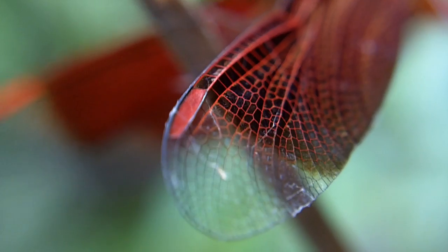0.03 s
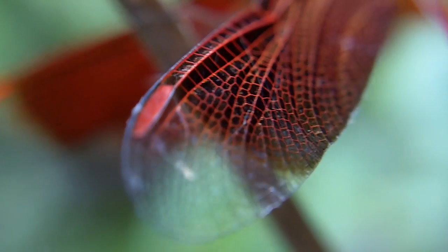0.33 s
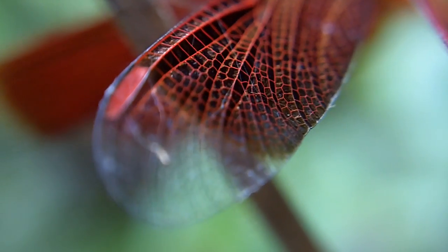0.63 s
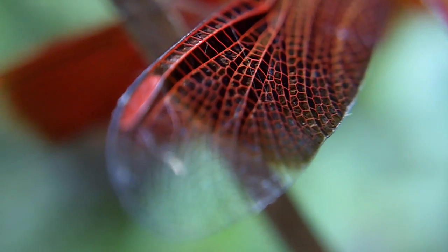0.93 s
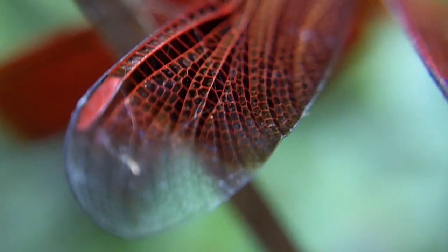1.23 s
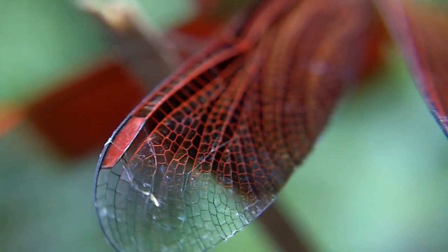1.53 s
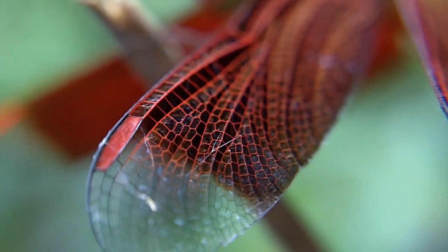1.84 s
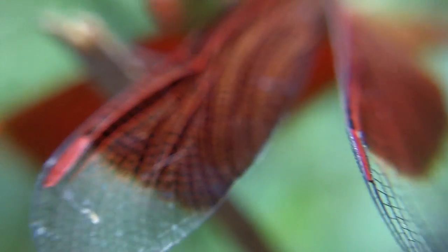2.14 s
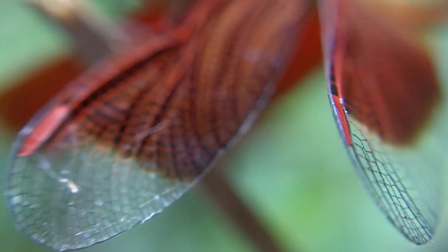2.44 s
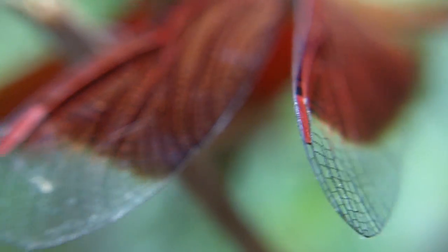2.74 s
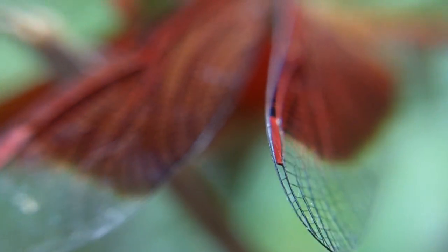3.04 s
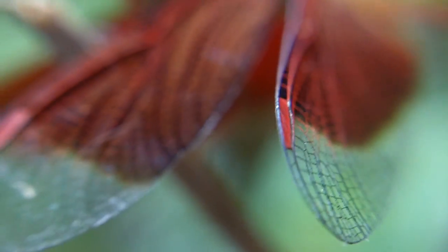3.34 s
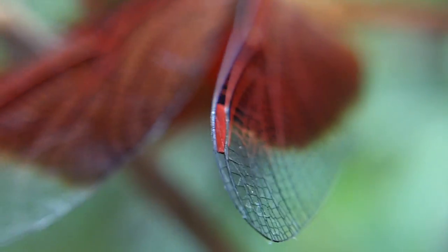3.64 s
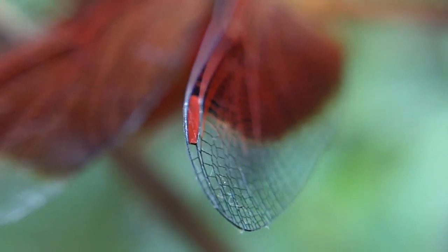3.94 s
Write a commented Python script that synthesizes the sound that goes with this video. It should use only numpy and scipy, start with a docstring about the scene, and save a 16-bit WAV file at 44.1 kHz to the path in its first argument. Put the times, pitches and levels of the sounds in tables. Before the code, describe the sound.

Soft outdoor air hisses while far insects shrill and rasp over a low rumble.

```python
"""A soft hiss of distant air fills quiet greenery. Far insects blend into one shrill band near 7 kHz,
and a single insect rasps in five slow swells. A distant motor hums over a low rumble, and a faint
whistle comes near the end. The sound starts after a moment of silence, all from one microphone,
with a dip in the treble."""
import sys
import numpy as np
from scipy import signal
from scipy.fft import rfft, irfft, next_fast_len
from scipy.io import wavfile
from scipy.ndimage import map_coordinates

SR = 44100
rng = np.random.default_rng(int(sys.argv[2]) if len(sys.argv) > 2 else 0)


def wav_record(signal):
    """Record a signal, one row per channel, as 16-bit PCM in the file named by sys.argv[1]."""
    frames = np.transpose(np.atleast_2d(signal))
    bounded = np.clip(frames, -1, 1)
    # unit amplitude maps onto the largest positive 16-bit level
    quanta = np.round(bounded * 32767).astype(np.int16)
    wavfile.write(sys.argv[1], SR, quanta)


N = 176400  # 4 s

# Tone of the steady hiss: f/Hz, relative level/dB
HISS_TONE = [(150, -1), (250, -1), (330, -5), (500, -5), (700, -8.5), (1000, -8.5), (1500, -8.5),
             (2000, -9.5), (3000, -11), (4300, -12), (6200, -5.5), (7000, -6), (8000, -12.5), (10000, -23),
             (12000, -31), (13500, -35.5), (15000, -44)]
# Tone of the duller, distant wash: f/Hz, relative level/dB
WASH_TONE = [(100, -33), (300, -4), (600, 2), (950, 2), (1500, -4), (2500, -12), (5000, -37), (9000, -100)]
# Loudness of the wash: t/s, level/dB
WASH_LOUDNESS = [(0, -49.5), (.7, -51), (.92, -48), (1.2, -49), (1.55, -48.5), (1.87, -49.5), (2.2, -47.5),
                 (2.5, -48), (3, -49), (3.3, -48), (4, -48.5)]
def air():
    """Air makes a steady hiss and a distant wash that gently comes and goes."""
    hiss = amp(db=-42) * rush(HISS_TONE)
    drift_db = .5 * wobble(per_second=7.2)
    wash = amp(curve(WASH_LOUDNESS) + drift_db) * rush(WASH_TONE)
    return hiss + wash


# Tone of the far crowd of insects: f/Hz, relative level/dB
CROWD_TONE = [(5000, -68), (6100, -14), (6600, -12), (6900, -2), (7230, 4), (7450, -7.5), (7750, -21),
              (8500, -42), (13500, -44), (14300, -37), (15000, -52)]
# Nearer insects, one per row: f/Hz, level/dB
NEAR_SINGERS = [(6830, -60), (7065, -60.5), (7240, -55.5), (7415, -60.5)]
def insect_chorus():
    """Many far insects blur into one shrill band; a few nearer ones stand out as fuzzy notes."""
    flutter_db = -.1 * wobble(per_second=45)
    chorus = amp(db=-52) * unit(rush(CROWD_TONE) * amp(flutter_db))
    blur_hz = 70.9
    for hz, db in NEAR_SINGERS:
        tone = np.exp(2j * np.pi * hz * np.arange(N) / SR)
        blur = wobble(blur_hz) + 1j * wobble(blur_hz)  # shakes both loudness and pitch
        chorus += amp(db) * unit(np.real(blur * tone))
    return chorus


# Tone of the rasp: f/Hz, relative level/dB
RASP_TONE = [(500, -45), (2000, -10), (4500, -3), (6400, 10), (8500, -0.5), (10500, -7), (12500, -16),
             (15000, -27)]
# Swells of the rasp: peak t/s, length/s, level/dB
RASP_SWELLS = [(.32, .23, -48), (1.13, 0.24, -47.5), (1.824, 0.16, -46.5), (2.523, 0.17, -47.5),
               (3.357, .05, -48)]
def rasping_insect():
    """One insect's high, scratchy noise swells and fades every 0.7 to 0.8 s."""
    loudness = sum(amp(db) * swell(peak_s, length_s) for peak_s, length_s, db in RASP_SWELLS)
    return loudness * rush(RASP_TONE)


# The motor's lowest tone: t/s, level/dB
HUM_LOWEST = [(0, -59), (.35, -49), (.6, -39.5), (1, -41.5), (1.12, -32), (1.45, -37), (1.8, -34.5),
              (2.1, -43), (2.5, -44.5), (2.9, -50), (3.2, -40), (3.42, -32), (3.75, -33), (4, -36.5)]
# Its second tone, an octave higher: t/s, level/dB
HUM_SECOND = [(0, -68), (.6, -55.5), (.8, -51.5), (1.25, -46.5), (1.6, -51), (1.8, -44), (2.1, -47.5),
              (2.35, -52), (2.65, -46), (2.9, -55.5), (3.25, -43), (3.5, -60), (3.72, -43), (4, -53)]
# Its third and fourth tones: t/s, third level/dB, fourth level/dB
HUM_UPPER = [(0, -70, -63), (.6, -73, -68.5), (1.1, -53, -50.5), (1.5, -66, -60.5), (1.9, -48, -57),
             (2.45, -65, -52), (2.8, -75, -66.5), (3.6, -57, -52), (4, -62, -69)]
def motor():
    """A far motor hums at 1, 2, 3 and 4 times its pitch; each tone fades in and out."""
    pitch_hz, wander = 49.36, .00848
    phase = 2 * np.pi * np.cumsum(pitch_hz * (1 + wander * wobble(per_second=5))) / SR
    times, third, fourth = np.transpose(HUM_UPPER)
    hum = np.zeros(N)
    for k, levels in enumerate([HUM_LOWEST, HUM_SECOND, np.c_[times, third], np.c_[times, fourth]]):
        waver = .26 * k * wobble(per_second=13)  # higher tones waver more
        hum += amp(curve(levels)) * np.sqrt(2) * np.sin((k + 1) * phase + waver)
    return hum


# Tone of the rumble: f/Hz, relative level/dB
RUMBLE_TONE = [(5, 2), (15, 3), (30, 2), (45, -3), (65, -4), (90, -10), (130, -13), (190, -21.5),
               (260, -22), (400, -34), (1500, -100)]
# Loudness of the rumble: t/s, level/dB
RUMBLE_LOUDNESS = [(0, -35), (.7, -39.5), (1.15, -37), (1.5, -39), (1.95, -34.5), (2.6, -37.5),
                   (3.1, -37.5), (4, -36)]
def rumble():
    """Very deep noise slowly rises and falls."""
    return amp(curve(RUMBLE_LOUDNESS)) * rush(RUMBLE_TONE)


def far_whistle():
    """One faint, short note, perhaps a bird, barely above the air."""
    pitch_hz = 1450
    tone = np.sqrt(2) * np.sin(2 * np.pi * pitch_hz * np.arange(N) / SR)
    return amp(db=-54) * swell(peak_s=3.875, length_s=.05) * tone


def amp(db):
    """Turns decibels into a number to multiply by."""
    return 10 ** (np.asarray(db) / 20)


def unit(x):
    """Scales a sound to an average strength (rms) of 1."""
    return x / np.sqrt(np.mean(x ** 2) + 1e-20)


def curve(rows):
    """Joins (t/s, value) points with straight lines."""
    return np.interp(np.arange(N) / SR, *np.transpose(rows))


def swell(peak_s, length_s):
    """A bell-shaped rise and fall."""
    return np.exp(-2 * ((np.arange(N) / SR - peak_s) / length_s) ** 2)


def wobble(per_second):
    """A smooth curve through this many random points a second."""
    points = rng.standard_normal(1024)
    return map_coordinates(points, [np.arange(N) * per_second / SR], mode="wrap")


def rush(tone):
    """Noise of strength 1, shaped by (f/Hz, level/dB) points."""
    hz, db = np.transpose(tone)
    size = next_fast_len(N + SR // 2)
    all_hz = np.fft.rfftfreq(size, 1 / SR)
    gain = amp(np.interp(np.log(all_hz + 1), np.log(hz + 1), db))
    spectrum = rfft(rng.standard_normal(N), size)
    return unit(irfft(spectrum * gain, size)[:N])


def scene():
    """Everything reaches one microphone, so left and right are the same."""
    mono = air() + insect_chorus() + rasping_insect() + motor() + rumble() + far_whistle()
    return np.array([mono, mono])


# Steady shift of the wave away from zero: left/full scale, right/full scale
CHANNEL_SHIFTS = [.0015, .0267]
def record(dry):
    """The recorder dips the treble, shifts each channel, opens late and cuts the highest sounds."""
    dip_hz, dip_width_hz, top_hz = 5475, 2530, 14950
    silent_s, fade_in_s, fade_out_s = .069, .01, .002
    dipped = signal.lfilter(*signal.iirnotch(dip_hz, dip_hz / dip_width_hz, SR), dry)
    shifted = dipped + np.array(CHANNEL_SHIFTS)[:, None]
    fade_in = np.clip((np.arange(N) / SR - silent_s) / fade_in_s, 0, 1)
    fade_out = np.clip(np.arange(N)[::-1] / (SR * fade_out_s), 0, 1)
    low_pass = signal.ellip(12, .1, 80, top_hz, fs=SR, output="sos")
    return signal.sosfilt(low_pass, fade_in * fade_out * shifted)


dry = scene()
out = record(dry)
wav_record(out)
```